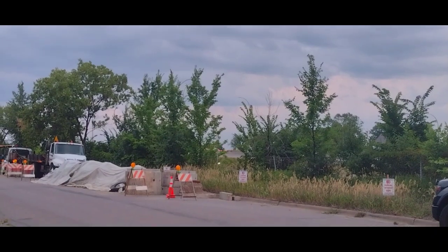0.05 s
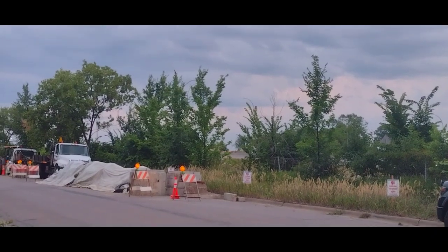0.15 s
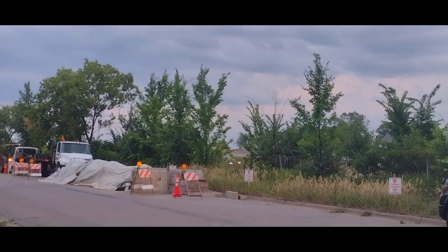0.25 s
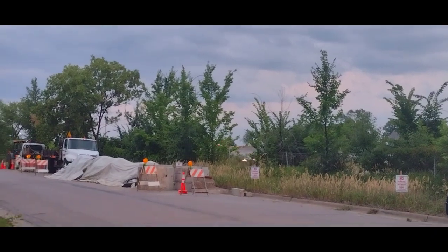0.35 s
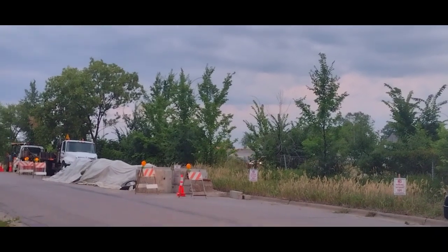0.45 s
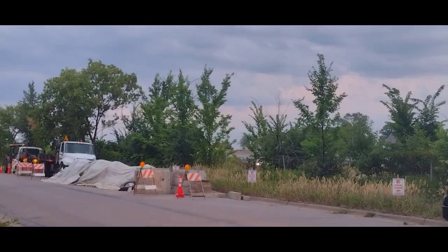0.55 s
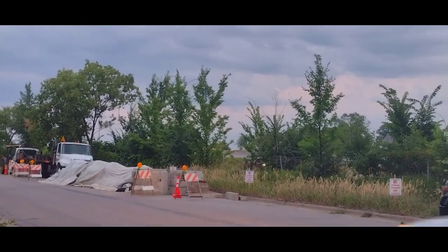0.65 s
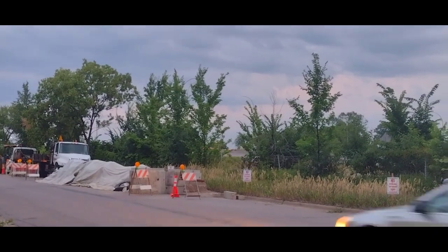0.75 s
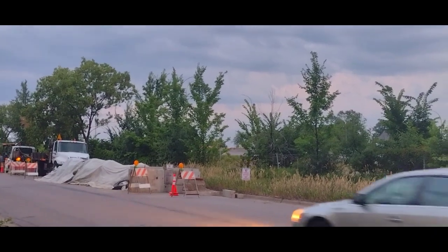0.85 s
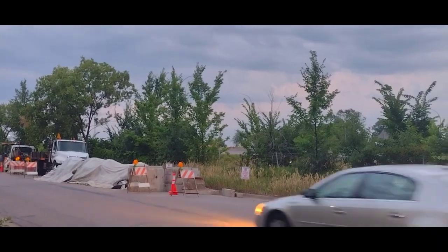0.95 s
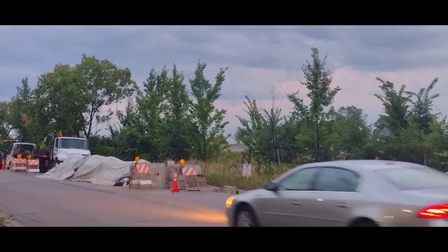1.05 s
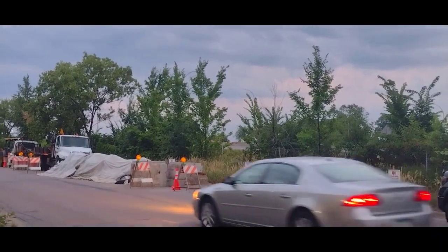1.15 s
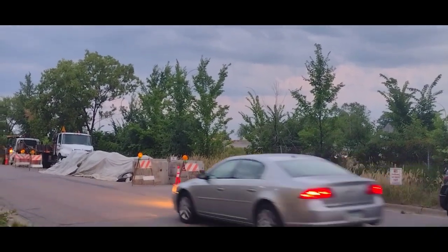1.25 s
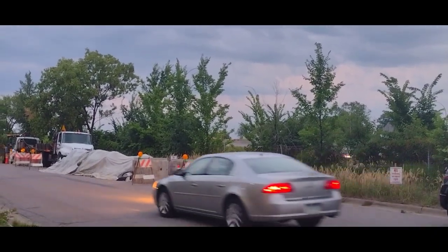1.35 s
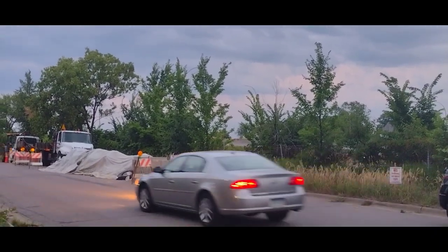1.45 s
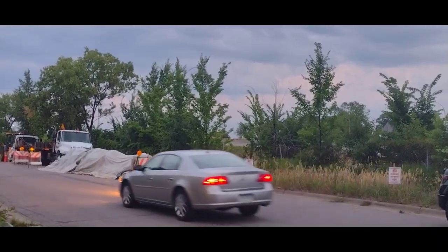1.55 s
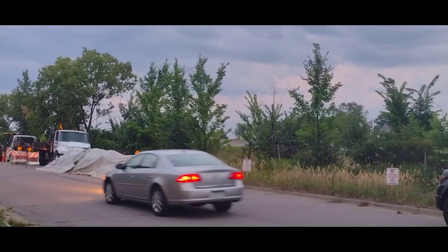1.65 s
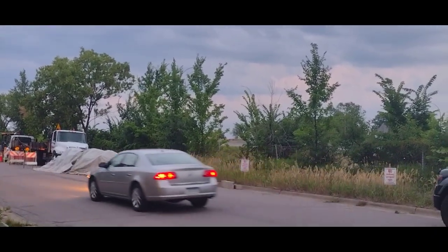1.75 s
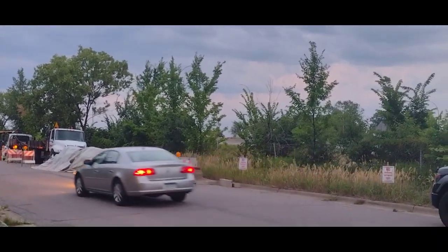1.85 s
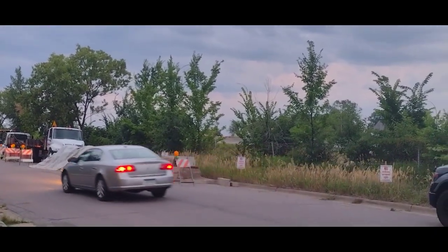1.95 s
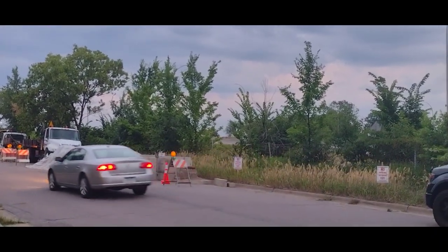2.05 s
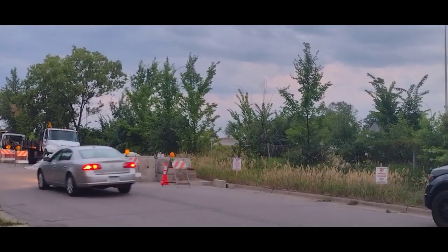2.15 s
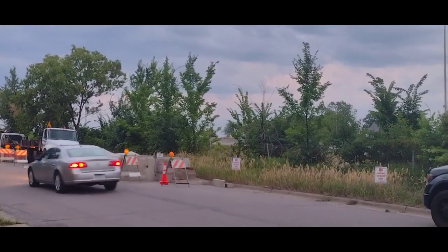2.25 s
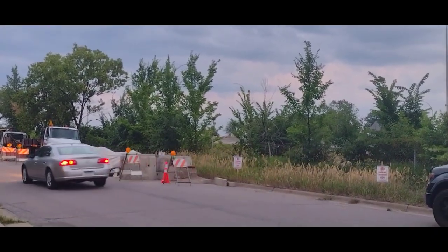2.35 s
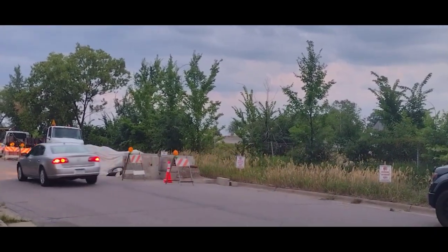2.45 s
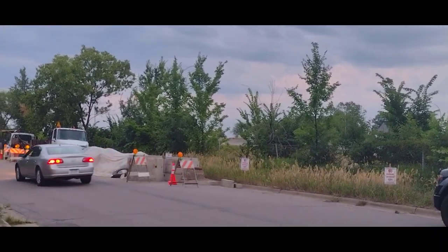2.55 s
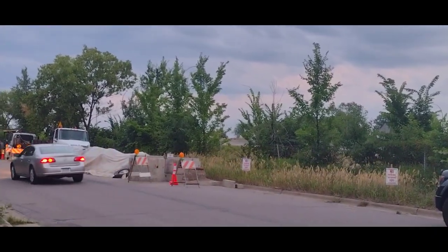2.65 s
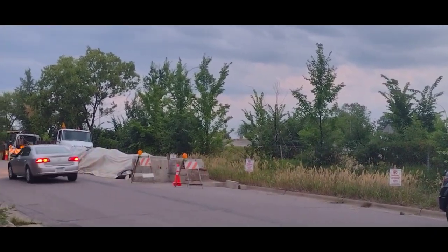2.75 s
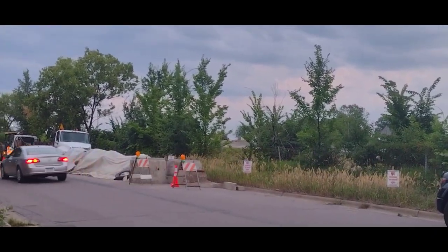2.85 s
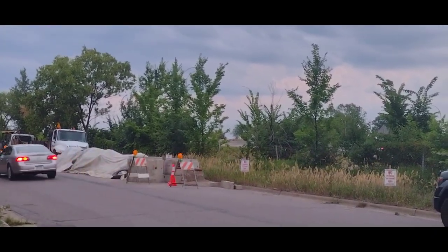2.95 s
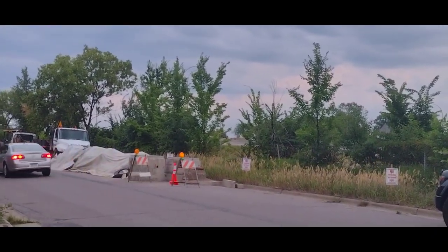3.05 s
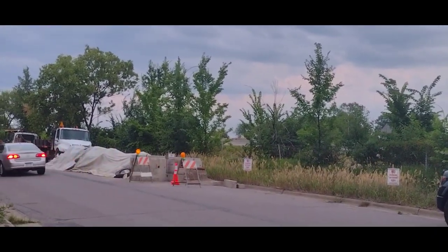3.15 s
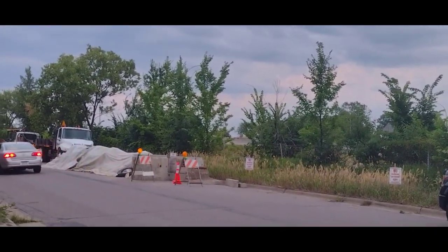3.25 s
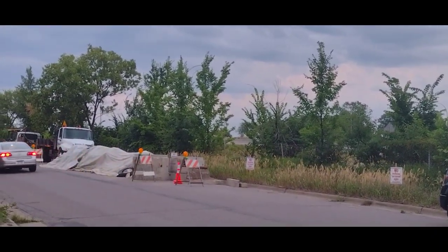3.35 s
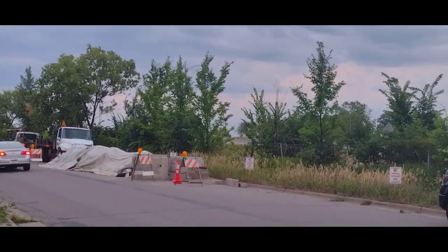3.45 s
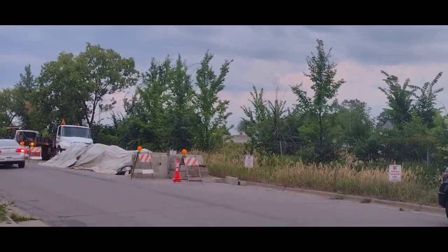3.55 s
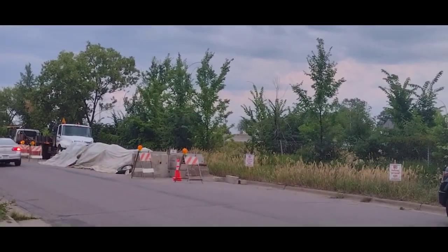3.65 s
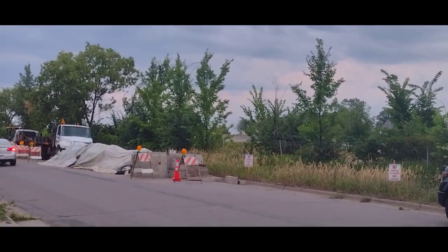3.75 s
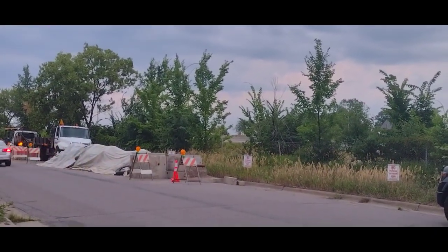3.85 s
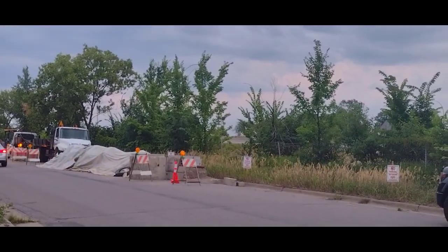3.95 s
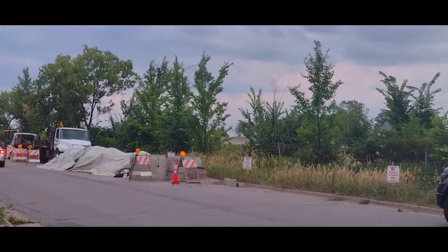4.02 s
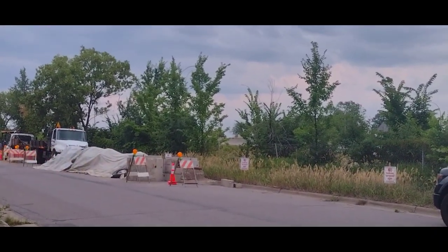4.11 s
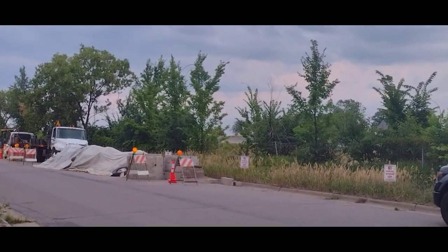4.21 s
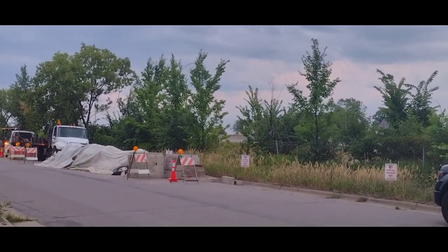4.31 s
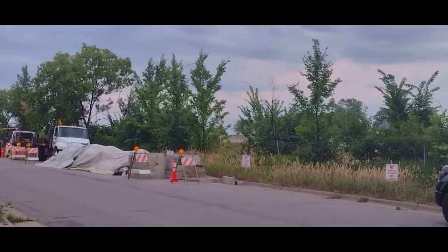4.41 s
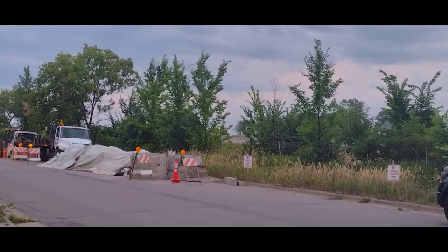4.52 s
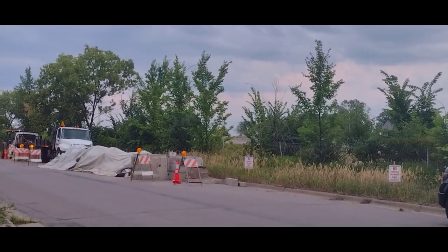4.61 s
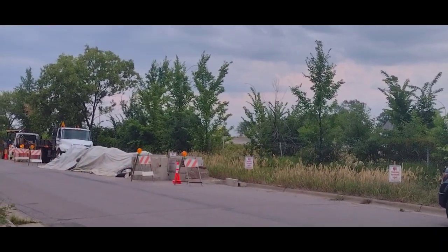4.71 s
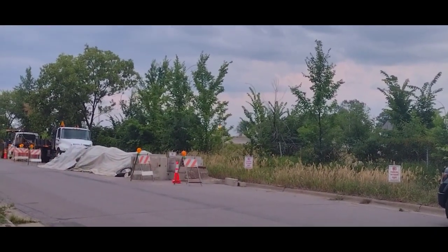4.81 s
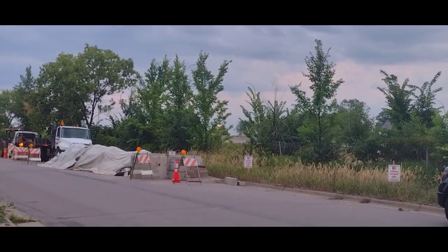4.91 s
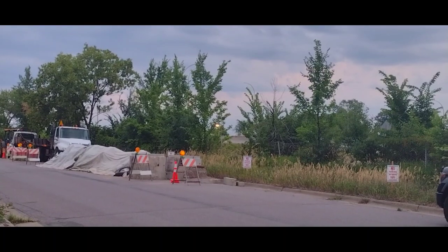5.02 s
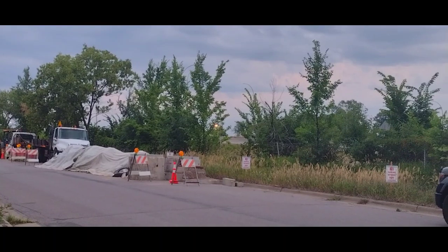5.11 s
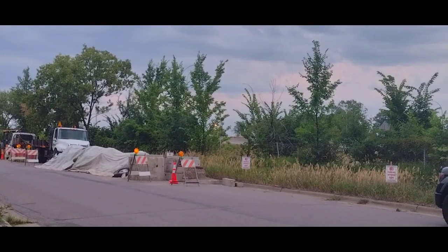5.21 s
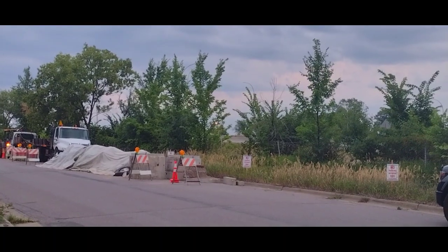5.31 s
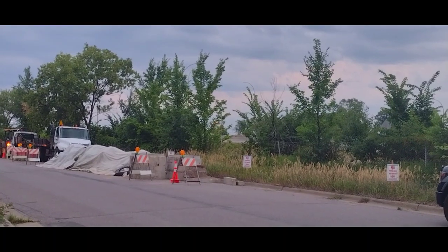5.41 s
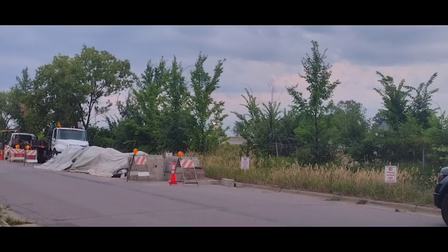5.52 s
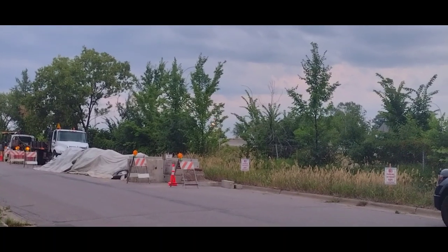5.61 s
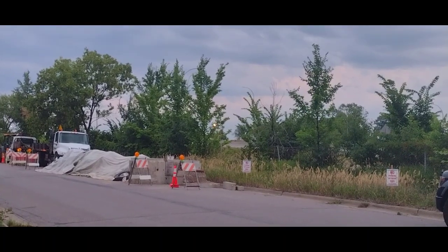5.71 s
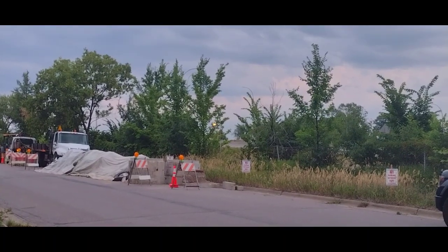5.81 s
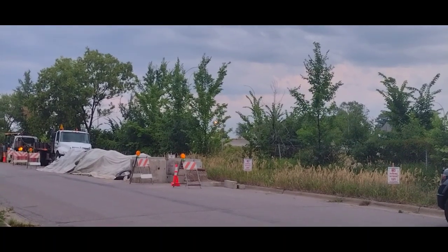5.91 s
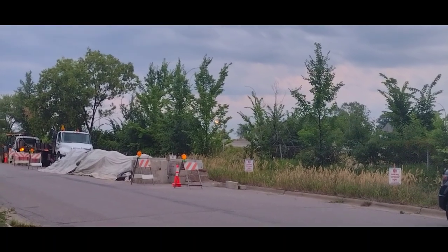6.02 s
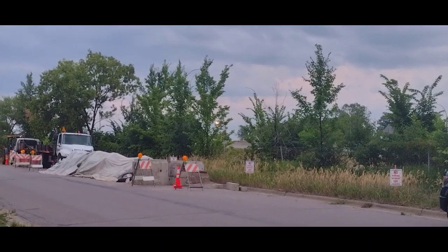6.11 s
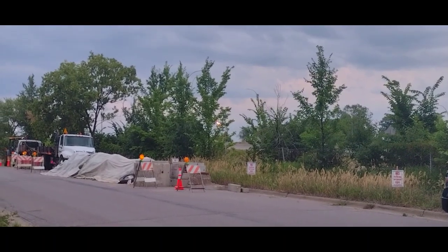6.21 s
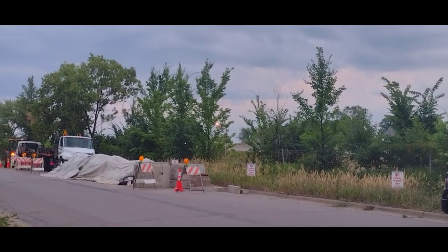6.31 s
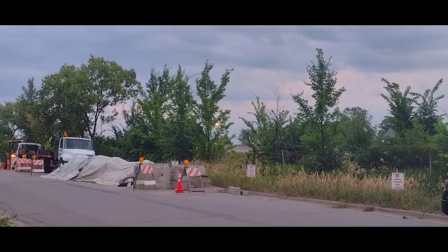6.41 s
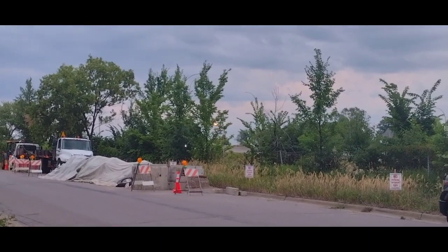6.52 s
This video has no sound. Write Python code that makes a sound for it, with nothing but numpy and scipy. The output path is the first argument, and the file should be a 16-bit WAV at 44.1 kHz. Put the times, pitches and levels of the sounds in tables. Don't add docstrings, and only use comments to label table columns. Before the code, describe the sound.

An open roadside heard on a hand-held stereo phone with thin deep bass. From 0 to 1.4 s, irregular wind gusts pop and flutter, strongest in the left side around 0.2 to 0.4 s, with smaller bursts near 0.7, 0.9 and 1.3 s. Short soft air hisses come at about 0.1 and 0.2 s, and a very faint one at 1.3 s. A car rolls out from the right, its tread noise first muffled, then open and brightest as it passes near 1.1 s. It moves left, a brief exhaust boom near 1.9 s, then a steady low drone around 150 Hz, clearest from 2.4 to 4.6 s while the tyre noise dulls and fades. Distant heavy traffic rumbles on the right, swelling again near 4.2 s. From about 4 s a broad jet roar grows, swells at 5.4, dips at 5.85, and rises to its loudest at 6.5 s.

```python
import sys
import numpy as np
from scipy import signal
from scipy.fft import rfft, irfft, next_fast_len
from scipy.io import wavfile
from scipy.ndimage import uniform_filter1d, map_coordinates

SR = 44100
rng = np.random.default_rng(int(sys.argv[2]) if len(sys.argv) > 2 else 0)


def transcribe(u):
    v = np.clip(np.atleast_2d(u).T, -1, 1)
    q = np.round(v * 32767).astype(np.int16)
    wavfile.write(sys.argv[1], SR, q)


def voltage_ratio(decibels):
    exponent = np.asarray(decibels, float) / 20
    return 10 ** exponent


N = 289737
FRAME = 1024
HZ = np.fft.rfftfreq(FRAME, 1 / SR)
HZ_COLUMN = HZ[:, None]
PER_HZ = np.sqrt(SR / 2)


def along(points, hz):
    f, *cols = np.transpose(points)
    return np.array([np.interp(np.log(hz + 1), np.log(f + 1), c) for c in cols])


def curves(rows, t):
    s, *cols = np.transpose(rows)
    return np.array([np.interp(t, s, c) for c in cols])


def spread(levels_db, centres_hz):
    return along(np.c_[centres_hz, np.eye(len(centres_hz))], HZ).T @ levels_db


def resonance(centre_hz, width_hz):
    return 1 / (1 + (2 * (HZ_COLUMN - centre_hz) / width_hz) ** 2)


def wobble(rate_hz):
    knots = rng.standard_normal(int(N * rate_hz / SR) + 4)
    return map_coordinates(knots, [np.arange(N) * rate_hz / SR])


def rush(level_db, lag, alike, patchy_db):
    overlap = FRAME * 3 // 4
    t, (a, b) = signal.stft(rng.standard_normal((2, N)), SR, nperseg=FRAME, noverlap=overlap)[1:]
    field = uniform_filter1d(rng.standard_normal(a.shape), size=5, axis=0)
    field = uniform_filter1d(field, size=14, axis=1)
    turn = np.arccos(np.clip(alike, 0, 1))[:, None] / 2
    mid, side = np.cos(turn) * a, np.sin(turn) * b
    ramp = np.exp(-1j * np.pi * HZ_COLUMN * lag(t) / SR)
    pair = np.array([(mid + side) * ramp, (mid - side) / ramp])
    gain = PER_HZ * voltage_ratio(level_db(t) + patchy_db * field / field.std())
    return signal.istft(pair * gain, SR, nperseg=FRAME, noverlap=overlap)[1][:, :N]


# t/s, peak level/dB, f/Hz
EDDIES = [(0.023, -13.5, 190), (0.044, -11, 222), (0.189, -22, 224), (0.204, -20, 259), (0.214, -10.5, 174),
          (0.219, -5, 248), (0.226, -11, 225), (0.235, -7.5, 227), (0.243, -8.5, 250), (0.252, -10, 245),
          (0.259, -10, 150), (0.268, -4, 227), (0.277, -16, 162), (0.293, -25, 169), (0.341, -8.5, 195),
          (0.357, -14, 220), (0.37, -20, 144), (0.671, -10.5, 158), (0.682, -18, 195), (0.702, -15.5, 249),
          (0.715, -19, 190), (0.73, -15.5, 142), (0.872, -15, 120), (0.903, -19, 185), (0.918, -12.5, 101),
          (1.264, -20, 143), (1.306, -20, 203), (1.348, -23, 147), (1.377, -21, 178), (5.403, -26.5, 170)]
# start t/s, hold t/s, left level/dB, right level/dB
GUSTS = [
    (0, 0.026, -23.5, -56.5),
    (0.23, 0.14, -23.5, -47),
    (.46, 0.064, -31.5, -29),
    (.68, 0.079, -27, -61),
    (0.875, 0.016, -30, -45),
    (1.3, 0.16, -30, -46),
    (5.104, 0.33, -46, -66),
]
# f/Hz, level/dB
FLUTTER = [(25, -25), (60, 10.5), (120, 5.5), (250, -2), (500, -16), (1000, -37), (3000, -100)]


def wind():
    eddy_cycles, overtone = 0.46, 0.24
    push_db, push_pitch = -11, 0.43
    rise_db_per_s, fall_db_per_s = 183, 172
    out, t = np.zeros((2, N + SR)), np.arange(-1200, 1200) / SR
    for (s, db, hz), phase in zip(EDDIES, rng.uniform(0, 2 * np.pi, len(EDDIES))):
        swing = 2 * np.pi * hz * t + phase
        flick = np.exp(-.5 * (t * hz / eddy_cycles) ** 2)
        flick = flick * (np.cos(swing) + overtone * np.cos(2 * swing))
        push = np.exp(-.5 * (t * hz * push_pitch / eddy_cycles) ** 2)
        push = voltage_ratio(push_db) * push * np.cos(push_pitch * swing)
        out[0, round(s * SR):][:len(t)] += voltage_ratio(db) * (flick + push)
    eddies = out[:, len(t) // 2:][:, :N]

    m = next_fast_len(N + 8192)
    colour = voltage_ratio(along(FLUTTER, np.fft.rfftfreq(m, 1 / SR)))
    air = irfft(rfft(rng.standard_normal((2, N)), m) * colour, m)[:, :N]
    air = air * voltage_ratio(3.6 * np.array([wobble(30), wobble(26)]))
    now = np.arange(N) / SR
    strength = voltage_ratio([[-59], [-66]])
    for s, hold, *ports_db in GUSTS:
        rise_db = -rise_db_per_s * np.clip(s - now, 0, None)
        fall_db = -fall_db_per_s * np.clip(now - s - hold, 0, None)
        strength = strength + voltage_ratio(np.c_[ports_db] + rise_db + fall_db)
    return eddies + air / air.std() * strength


# f/Hz, car [0-1], far sources [0-1]
ALIKE = [(60.4, 0.96, 0.93), (396, 0.88, 1), (1000, 0.61, 0.6), (2200, 0.25, .6), (3980, 0.27, .15),
         (9000, 0.22, 0.13)]


def likeness():
    return along(ALIKE, HZ)


# f/Hz, left level/dB per Hz, right level/dB per Hz
FAR_ROAD = [(40, -60, -60.5), (70, -58.5, -59), (151, -68, -68.5), (250, -80.5, -79.5), (543, -79.5, -78.5),
            (850, -72.5, -71), (1170, -72.5, -73.5), (1920, -90, -82), (2470, -84, -89.5),
            (3210, -101, -100), (4700, -104, -111), (6550, -116, -119), (10000, -129, -129)]
# t/s, rumble level/dB
TRAFFIC = [
    (0, 8),
    (2, -1),
    (3.7, -4),
    (4.2, 7.5),
    (5.6, 3),
    (5.85, -1.5),
    (6, 2),
    (6.25, -1.5),
    (6.57, 1),
]


def traffic():
    roar_db, roar_follows = -0.5, 0.073
    screen_db, screen_ends_s = -10, 1.6

    def level_db(t):
        rumble = curves(TRAFFIC, t)[0]
        screen = screen_db * np.clip(1 - t / screen_ends_s, 0, 1)
        roar = roar_follows * rumble + roar_db + screen
        return along(FAR_ROAD, HZ)[..., None] + spread(np.array([rumble, roar]), [150, 1000])

    return rush(level_db, lambda t: 21 + 0 * t, likeness()[1], patchy_db=1.3)


# t/s, distance/m
DISTANCE = [(0, 7.4), (.3, 6.7), (.6, 7.35), (1.1, 6.2), (1.4, 6.5), (2, 9.4), (2.3, 10.3), (2.9, 18),
            (3.5, 26), (4.1, 41.5), (4.7, 87), (5.2, 92)]


def spreading_db(t):
    return -20 * np.log10(curves(DISTANCE, t)[0] / 7)


# t/s, left port lag/samples, stage (0 hidden, 1 open, 2 passing, 3 leaving)
PATH = [(0, 21, 0), (.58, 16, 0.22), (.78, 12.5, 1.5), (.95, 9.5, .97), (1.3, 5.5, 1.84), (1.5, 5, 1.5),
        (1.95, -5, 2.5), (2.3, -4.5, 2.5), (2.8, -7, 3), (4, -7, 8), (6.57, -11, 8)]
# f/Hz, left level/dB per Hz, right level/dB per Hz
HIDDEN = [(80, -62, -77), (233, -58, -57.5), (514, -63.5, -65), (746, -60.5, -65.5), (1460, -77, -74),
          (1900, -64, -67), (2680, -73.5, -74), (3340, -88.5, -85), (6300, -89, -99), (8500, -94.5, -101),
          (10000, -100, -99), (11600, -106, -110), (15500, -110, -105)]
OPEN = [(79.3, -52, -63.5), (259, -56.5, -55), (407, -64.5, -67.5), (610, -72.5, -69), (980, -57, -58),
        (1520, -78, -78), (2120, -70.5, -68), (3100, -81, -76.5), (3280, -86, -86), (5000, -86, -99),
        (6460, -90.5, -98), (8400, -101, -102), (9700, -102, -102), (15900, -110, -110)]
PASSING = [(80, -73, -71), (237, -56.5, -57), (417, -69.5, -67.5), (574, -74.5, -72.5), (940, -59, -58),
           (1240, -70, -69), (2090, -70, -67.5), (3350, -89.5, -90.5), (4560, -83, -94), (8100, -104, -106),
           (9200, -101, -105), (9500, -96, -102), (10500, -106, -110), (16000, -113, -115)]
LEAVING = [(79.5, -62.5, -62), (400, -64.5, -64.5), (550, -84, -81), (680, -66, -64.5), (1050, -56.5, -56),
           (1300, -68, -64), (2360, -73, -75), (3430, -94, -99.5), (4830, -82.5, -91), (5740, -89, -99.5),
           (6860, -103, -104), (8300, -95, -102), (9500, -100, -104), (10500, -110, -110)]
# f/Hz, width/Hz, level/dB
GROOVES = [(916, 70, 2), (1900, 210, 2), (5030, 330, -0.5)]
# f/Hz, share of spherical spreading
FADING = [(250, 0.19), (950, 0.77), (2200, 0.66), (5000, 1.4)]
# first f/Hz, last f/Hz, width/Hz, level/dB
GLIDES = [(9900, 8300, 1400, 3.5), (6800, 5500, 560, 2)]


def tyres():
    gone_s, gone_db_per_s = 4.9, 4
    rumble_goes_s, rumble_goes_db_per_s = 4.08, 14.5
    glide_from_s, glide_to_s = 1, 3.5
    abreast_s, abreast_width_s, abreast_db = 1.14, 0.14, 2
    load_rumble, load_from_db = 0.22, -38.5
    colours = [HIDDEN, OPEN, PASSING, LEAVING]
    ring = sum(db * resonance(hz, width_hz) for hz, width_hz, db in GROOVES)
    treble = np.clip(np.log2(HZ_COLUMN / 7000 + 1e-3), 0, None)
    bass = np.clip(np.log2(900 / (HZ_COLUMN + 1)) / 2, 0, 1)

    def level_db(t):
        stage = np.clip(curves(PATH, t)[1], 0, len(colours) - 1)
        colour = 0
        for k, points in enumerate(colours):
            colour = colour + along(points, HZ)[..., None] * np.clip(1 - abs(stage - k), 0, 1)
        faded = along(FADING, HZ).T * spreading_db(t)
        absorbed = 0.46 * treble * np.minimum(spreading_db(t), 0)
        gone = gone_db_per_s * np.clip(t - gone_s, 0, None)
        gone = gone + bass * rumble_goes_db_per_s * np.clip(t - rumble_goes_s, 0, None)

        way = np.clip((t - glide_from_s) / (glide_to_s - glide_from_s), 0, 1)
        echo = sum(db * resonance(hz + (end_hz - hz) * way, width_hz)
                   for hz, end_hz, width_hz, db in GLIDES)
        echo = echo * np.clip(stage - 1, 0, 1)

        load = bass * load_rumble * np.clip(curves(ENGINE, t)[1] - load_from_db, 0, None)
        beam_time = ((t - abreast_s) / abreast_width_s) ** 2
        beam = abreast_db * np.exp(-beam_time - ((HZ_COLUMN - 980) / 200) ** 2)
        flicker = 2.2 * np.minimum(treble, .6) * np.interp(t, np.arange(N) / SR, wobble(28))
        grooves = ring * np.minimum(stage, 1)
        return colour + faded - gone + absorbed + flicker + echo + load + beam + grooves

    return rush(level_db, lambda t: curves(PATH, t)[0], likeness()[0], patchy_db=1.02)


# t/s, shaft f/Hz, order 4 drone level/dB
ENGINE = [(0, 40, -76), (.6, 40, -45), (1.6, 38.84, -70), (2.3, 37.65, -62), (2.45, 37.8, -36.5),
          (2.77, 37.44, -39), (3.04, 36.83, -45.5), (3.2, 36.81, -35), (3.71, 36.8, -25.5),
          (3.93, 36.94, -34), (4.02, 36.67, -26.5), (4.63, 36.6, -35), (4.68, 36.46, -55), (5, 37.2, -49.5),
          (5.7, 36.61, -62), (5.85, 36.7, -39.5), (6.2, 36.3, -46.5), (6.57, 36.4, -42)]


def engine():
    thirds_db, evens_db, orders_fade = -44.5, -42, 0.64
    boom_s, boom_db, boom_rise_s, boom_fall_s = 1.863, 8.5, 0.23, 0.075
    t = np.arange(N) / SR
    shaft_hz, drone_db = curves(ENGINE, t)
    boom_width_s = np.where(t < boom_s, boom_rise_s, boom_fall_s)
    boom = boom_db * np.exp(-((t - boom_s) / boom_width_s) ** 2)
    fade_db = orders_fade * spreading_db(t)
    thirds = thirds_db + fade_db + boom
    evens = evens_db + fade_db
    port_lag_s = np.array([[-.5], [.5]]) * curves(PATH, t)[0] / SR
    turns = np.cumsum(shaft_hz) / SR + port_lag_s * shaft_hz
    # order, group level/dB, offset/dB, flutter/dB
    orders = [(4, drone_db, -1.5, 0.7), (3, thirds, -2.0, 1.2), (6, thirds, 3.0, 1.1),
              (2, evens, 0.5, 2.5), (8, evens, -5.0, 2.0), (10, evens, -8, 2.5)]
    out = np.zeros((2, N))
    for order, group_db, db, shake_db in orders:
        phase = 2 * np.pi * order * turns + 0.027 * order * wobble(5.7) + rng.uniform(0, 2 * np.pi)
        out += voltage_ratio(group_db + db + shake_db * wobble(5.17)) * np.sin(phase)
    return out


# t/s, length t/s, level/dB, f/Hz, width/Hz
PUFFS = [
    (.198, .08, -54, 9130, 2200),
    (.198, .08, -58, 13000, 5000),
    (0.081, 0.097, -58.5, 6400, 1400),
    (1.102, .012, -65, 14200, 2500),
    (1.33, .33, -72, 9600, 550),
    (1.32, .03, -66, 10800, 1200),
]


def puffs():
    out = np.zeros((2, N))
    for s, length_s, db, hz, width_hz in PUFFS:
        n = round(length_s * SR)
        edges_hz = [hz - width_hz / 2, hz + width_hz / 2]
        band = signal.butter(2, edges_hz, "band", fs=SR, output="sos")
        hiss = signal.sosfilt(band, rng.standard_normal((2, n)))
        out[:, round(s * SR):][:, :n] += voltage_ratio(db) * hiss / hiss.std() * signal.windows.tukey(n, .6)
    return out


# f/Hz, left level/dB per Hz, right level/dB per Hz
JET = [(100, -89, -82), (250, -70.5, -72), (504, -83.5, -82), (880, -72.5, -71), (1840, -76.5, -77),
       (2590, -91, -94.5), (3520, -110, -110), (6000, -140, -140)]
# t/s, level/dB
SWELL = [
    (4, -12.5),
    (5, -7),
    (5.2, -6.5),
    (5.38, -4),
    (5.55, -5.5),
    (5.85, -10),
    (6.1, -3),
    (6.35, -2),
    (6.57, 0.5),
]
# t/s, f/Hz
JET_BAND = [(5.3, 1615), (6, 1900), (6.57, 2200)]


def jet():
    band_db, band_width_hz = 6.5, 450

    def level_db(t):
        band = band_db * resonance(curves(JET_BAND, t)[0], band_width_hz)
        return along(JET, HZ)[..., None] + curves(SWELL, t)[0] + band

    return rush(level_db, lambda t: 16.9 + 0 * t, likeness()[1], patchy_db=-2.0)


def scene():
    return wind() + traffic() + tyres() + engine() + puffs() + jet()


def top_cut(x):
    return signal.sosfilt(signal.butter(12, 15750, fs=SR, output="sos"), x)


def record(dry):
    self_noise_db_per_hz, low_cut_hz = -124.6, 85.4
    hiss = PER_HZ * voltage_ratio(self_noise_db_per_hz) * rng.standard_normal(dry.shape)
    low_cut = signal.butter(3, low_cut_hz, "high", fs=SR, output="sos")
    return top_cut(signal.sosfilt(low_cut, dry + hiss))


dry = scene()
out = record(dry)
transcribe(out)
```